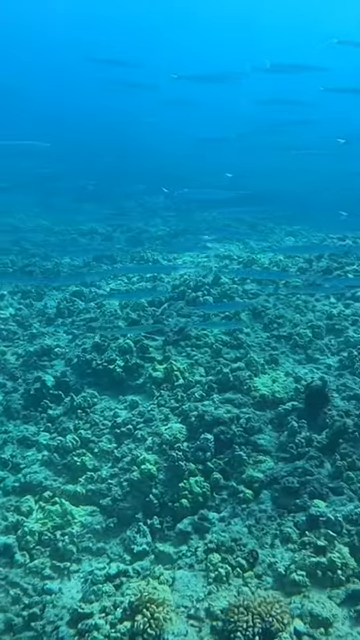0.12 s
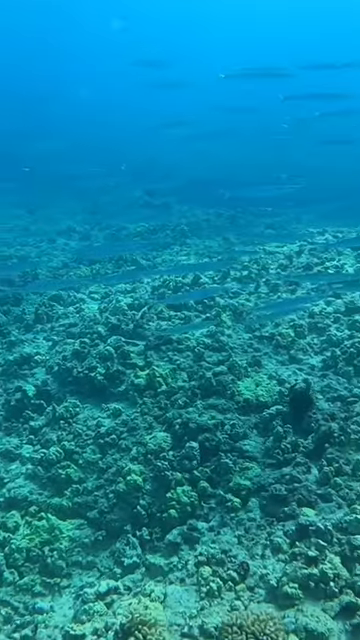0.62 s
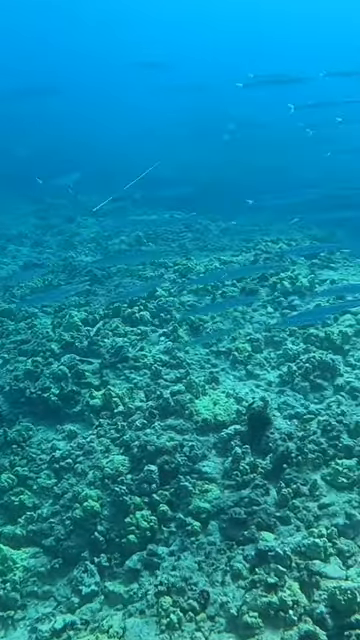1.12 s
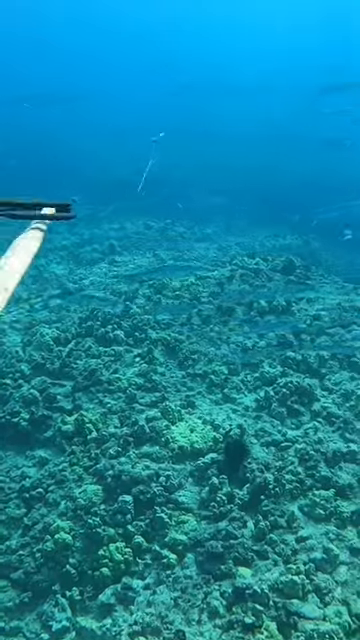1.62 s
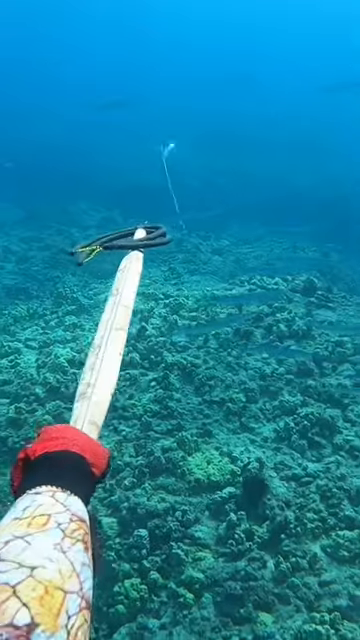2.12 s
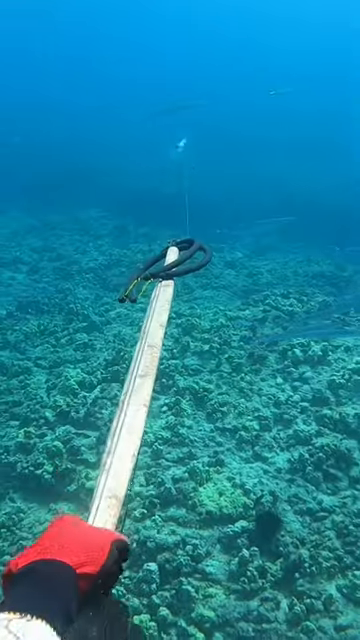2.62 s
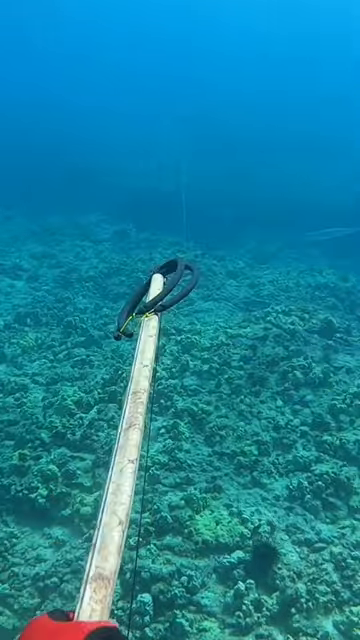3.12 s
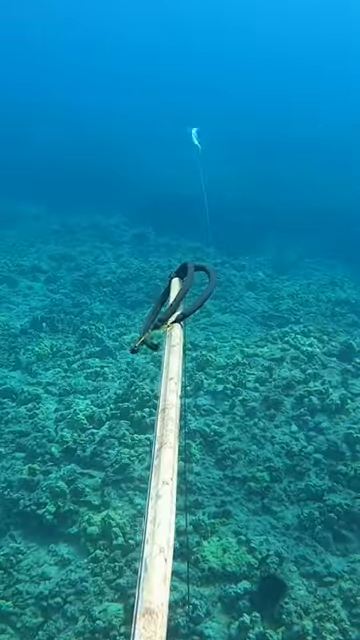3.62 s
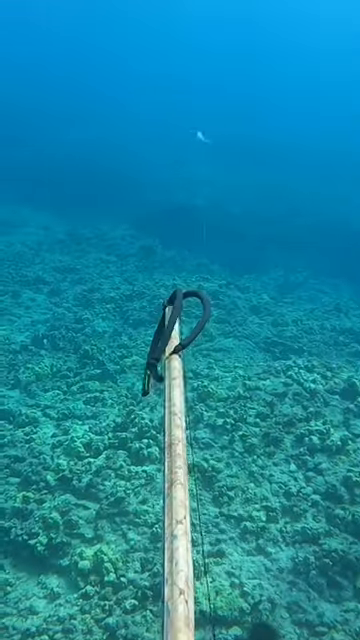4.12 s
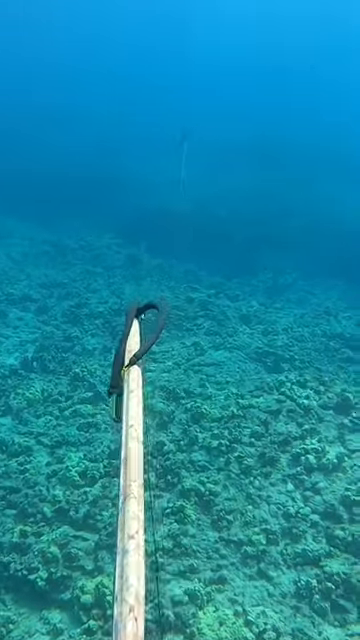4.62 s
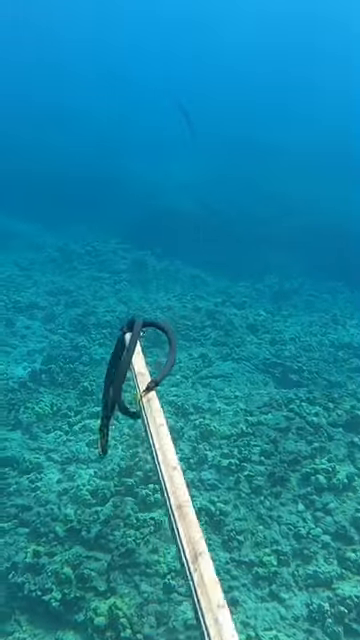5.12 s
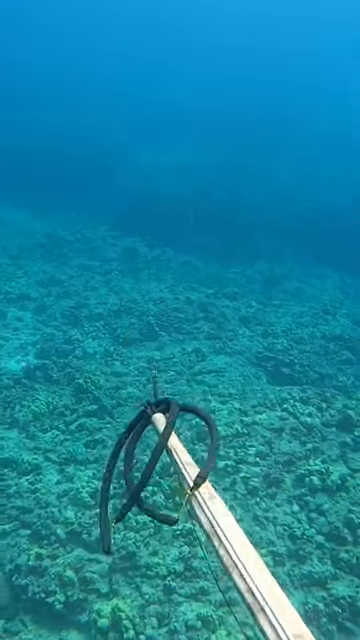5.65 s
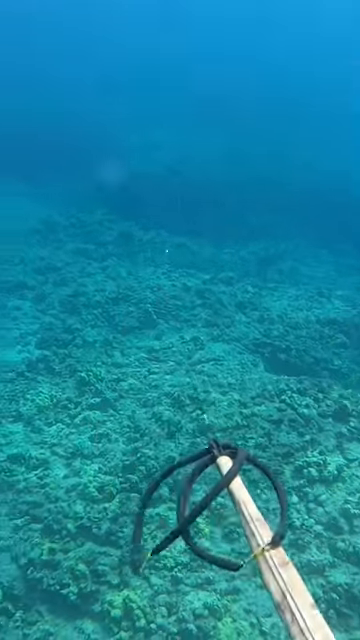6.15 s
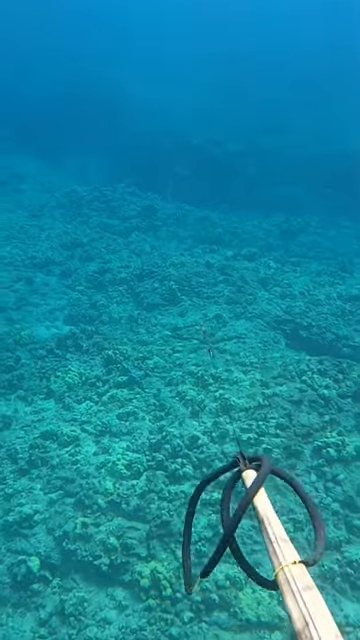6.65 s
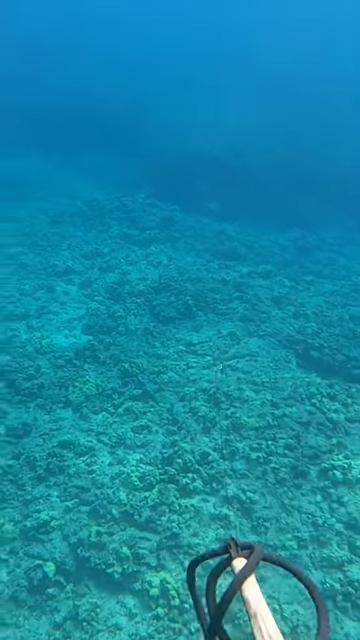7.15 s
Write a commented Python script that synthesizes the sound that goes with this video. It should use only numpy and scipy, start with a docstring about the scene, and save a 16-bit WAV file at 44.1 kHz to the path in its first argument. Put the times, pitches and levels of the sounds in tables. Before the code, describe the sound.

Low water turbulence and a steady snapping reef hiss, broken by hollow bumps on a housing, a hard crack, brief creaks, then rubbing.

```python
"""A small camera in a sealed case is carried under water over a reef.
From the start water rumbles and gurgles past the ports as filtered noise, and shrimp snap near and far
as noise puffs; three ticks, then knocks, a crack and taps ring briefly on the case.
From 3 s the camera fades from one microphone to its stereo pair; the grip creaks in stick-slip clicks
after 4 s, and from about 6 s something rubs along the case as friction grains through its modes."""
import sys
import numpy as np
from scipy import signal
from scipy.fft import rfft, irfft, next_fast_len
from scipy.io import wavfile
from scipy.ndimage import uniform_filter1d

SR = 44100
rng = np.random.default_rng(int(sys.argv[2]) if len(sys.argv) > 2 else 0)


def boost_factor(decibels):
    """Convert a level in decibels to a linear amplitude factor."""
    exponent = np.asarray(decibels, float) / 20
    return 10 ** exponent


def to_wav(sig):
    """Store sig (one row per channel, or 1-D mono) as 16-bit WAV at the path in sys.argv[1].

    Samples outside -1..1 are clipped; the rate is SR.
    """
    pcm = np.clip(np.atleast_2d(sig), -1, 1) * 32767
    pcm = np.round(pcm).astype(np.int16)
    wavfile.write(sys.argv[1], SR, pcm.T)  # frames by channels


N = 320148


def rms_one(x):
    """Scales x to an rms of 1."""
    return x / np.sqrt(np.mean(x ** 2) + 1e-20)


def in_time(rows):
    """Interpolates each column of a table over the scene."""
    s, *columns = np.transpose(rows)
    return [np.interp(np.arange(N) / SR, s, c) for c in columns]


def coloured(x, spectrum):
    """Shapes x by a (frequency [Hz], gain [dB]) spectrum."""
    hz, gain_db = np.transpose(spectrum)
    grid_hz = np.maximum(np.arange(N // 2 + 1) * SR / N, 1)
    curve_db = np.interp(np.log(grid_hz), np.log(hz), gain_db, left=-120, right=-120)
    return irfft(rfft(x) * boost_factor(curve_db), N)


def drift(rate):
    """Slow random wander of rms 1: coarse noise twice through a one-pole."""
    r = np.exp(-80 * np.pi * rate / SR)
    noise = rng.standard_normal(N // 40 + 2002)
    slow = signal.lfilter([1], [1, -2 * r, r * r], noise)[2000:]
    return np.interp(np.arange(N) / 40, np.arange(len(slow)), rms_one(slow))


def grains(per_s, spread_db, most=5):
    """Clicks at random moments, many small and few large."""
    size = boost_factor(spread_db * np.minimum(rng.exponential(1, N), most))
    signed = size * rng.choice([-1, 1], N)
    return rms_one(signed * (rng.random(N) < per_s / SR))


def band(x, low_hz, high_hz):
    """Butterworth band-pass."""
    return signal.sosfilt(signal.butter(2, [low_hz, high_hz], "band", fs=SR, output="sos"), x)


def add(out, s, burst):
    """Adds a burst at time s."""
    i = round(s * SR)
    out[i:i + len(burst)] += burst[:N - i]


def own_hiss():
    """Each channel's own electronics: faint independent high noise."""
    return boost_factor(-80.0) * band(rng.standard_normal((2, N)), 9100, 14300)


def puffs(per_s, spread_db, most):
    """Far snaps reach the case blurred into soft bursts of noise a few milliseconds long."""
    blur = np.hanning(SR // 200)
    envelope = np.convolve(np.abs(grains(per_s, spread_db, most)), blur, "same")
    return rms_one(envelope * rng.standard_normal(N))


# distant reef crackle: (time [s], level [dB], treble level [dB])
REEF_LEVELS = [(0.0, -37, -40), (0.95, -35.5, -41.5), (2.85, -40.5, -47), (4.39, -38.5, -44.5),
               (7.26, -42, -49)]


def reef():
    """Thousands of far shrimp merge into a hiss in waves, with lone bright snaps on top; one per mic."""
    level_db, treble_db = in_time(REEF_LEVELS)
    waves_db = 1.3 * drift(7.4)
    crackle = np.array([rng.standard_normal(N) + 0.095 * grains(400, 1.0) for mic in range(3)])

    low = band(crackle, 590, 1710) * boost_factor(level_db + waves_db + 2.37 * drift(25))

    middle = band(crackle + 0.43 * puffs(60, 4.9, most=2.9), 2730, 7850)
    middle *= boost_factor(level_db - 4.5 + waves_db + 1.46 * drift(45.0))

    bright = crackle + 0.12 * grains(45, 14.0, most=3.1) + 0.53 * puffs(30, 3.4, most=2.1)
    treble = band(bright, 6160, 10840) * boost_factor(treble_db + waves_db + 2.8 * drift(16.0))

    pricks = band(grains(30, 6.1, most=2.5), 10500, 15000) * boost_factor(treble_db - 10.5)
    return low + middle + treble + pricks


def pockets(per_s, cycles):
    """Small pockets of air, squeezed at random, ring down 60 dB in some cycles at one of 12 pitches."""
    clicks = grains(per_s, 4.0, most=3.0)
    dealt = rng.integers(0, 12, N)
    out = 0
    for k, hz in enumerate(np.geomspace(240, 700, 12)):
        r, w = boost_factor(-60 * hz / (cycles * SR)), 2 * np.pi * hz / SR
        struck = clicks * (dealt == k) + 1e-18
        out = out + np.sqrt(hz) * signal.lfilter([0, np.sin(w)], [1, -2 * r * np.cos(w), r * r], struck)
    return rms_one(out)


# spectra of the three sizes of turbulence: (frequency [Hz], gain [dB])
SURGE_SPECTRUM = [(2.9, -22), (5.0, -2), (28, -1.5), (47, -4.5), (90, -21), (120, -42), (200, -120)]
EDDY_SPECTRUM = [(70, -6), (95, 4.5), (150, 1.5), (190, -1), (235, -15.5), (330, -25)]
GURGLE_SPECTRUM = [(200, -11), (270, -4), (420, 2), (570, 1), (680, -11.5), (800, -17), (950, -84),
                   (1400, -42)]
# slow surge of water past the case: (time [s], level [dB])
SURGE_LEVELS = [(0, -27), (.4, -32.5), (.6, -28), (1.3, -26), (1.55, -22.5), (1.9, -20.5), (2.09, -28),
                (2.3, -19), (2.47, -23.5), (2.66, -19.5), (2.85, -29), (3.5, -20), (3.88, -29.5),
                (4.18, -20.5), (4.52, -32), (5.05, -20), (5.42, -31), (5.75, -24), (6.2, -30), (6.6, -24.5),
                (6.84, -26), (7.03, -33), (7.25, -25)]
# churn at the ports as the case is swung about: (time [s], eddy level [dB], gurgle level [dB])
CHURN_LEVELS = [(0, -47, -57.5), (0.42, -44, -56), (0.56, -41.5, -56), (1.05, -36, -49),
                (1.22, -33.5, -53.5), (1.4, -32.5, -47), (1.52, -34.5, -46.5), (1.6, -33.5, -43),
                (1.67, -29, -42), (1.76, -32, -44.5), (1.95, -38.5, -47.5), (2.5, -35, -45.5),
                (2.8, -37, -43.5), (3.04, -33, -44), (3.6, -38, -46), (4.0, -44, -49), (4.6, -41, -50),
                (5.0, -39.5, -56.5), (5.4, -40, -55.5), (5.75, -42, -54), (5.95, -29, -49.5),
                (6.15, -31, -47.5), (6.35, -40.5, -53), (6.85, -34.5, -49.5), (7.26, -43, -49.5)]


def flow():
    """Turbulence in three sizes: slow surge, lumpy eddies, small gurgling pockets of air."""
    surge_db, = in_time(SURGE_LEVELS)
    eddy_db, gurgle_db = in_time(CHURN_LEVELS)
    lumps = drift(10.5)   # shared by eddies and gurgle

    surge = rms_one(coloured(rng.standard_normal(N), SURGE_SPECTRUM))

    eddy = coloured(rng.standard_normal(N), EDDY_SPECTRUM)
    eddy = rms_one(eddy * boost_factor(2.56 * lumps + 1.3 * drift(12.0)))

    wash = rms_one(band(rng.standard_normal(N), 120, 1320))
    wash = wash + 1.03 * pockets(120 * boost_factor(2.5 * lumps), cycles=31.0)
    gurgle = rms_one(coloured(wash, GURGLE_SPECTRUM) * boost_factor(3.02 * lumps))
    return boost_factor(surge_db) * surge + boost_factor(eddy_db) * eddy + boost_factor(gurgle_db) * gurgle


# the sharpest snaps: (time [s], level [dB], treble gain [dB])
SNAP_EVENTS = [(0.257, -35, 15), (0.354, -22, -1), (0.678, -26, -2), (0.943, -17, -7), (0.962, -17.5, -13),
               (1.0886, -13.5, -29), (1.253, -21.5, -2), (2.513, -25, -1), (2.619, -21.5, -24),
               (2.709, -22, 6), (2.966, -28, -2), (3.178, -25.5, 1), (3.236, -21, -3), (3.329, -19, -5),
               (3.646, -24.5, -6), (3.93, -23, 4), (4.017, -22, -5), (4.225, -24, -7), (4.657, -24.5, -14),
               (4.761, -36, 9), (5.227, -39.5, 14), (5.437, -32, 1), (5.576, -27, 3), (5.752, -32, 0),
               (5.8833, -16.5, -11)]


def snaps():
    """A bubble collapses: a noise puff of a few milliseconds, each with its own share of treble."""
    out, t = np.zeros(N), np.arange(SR // 50) / SR
    envelope = np.exp(-t / 0.004) * (1 - np.exp(-t / 0.003))
    bursts = rng.standard_normal((len(SNAP_EVENTS), len(t))) * envelope
    for (s, level_db, treble_db), puff in zip(SNAP_EVENTS, bursts):
        body = band(puff, 2300, 7600) + boost_factor(-1.5) * band(puff, 1080, 1880)
        treble = boost_factor(treble_db) * band(puff, 6000, 15000)
        add(out, s, boost_factor(level_db) * (body + treble))
    return out


# thin ticks at the right port: (time [s], level [dB])
TICK_EVENTS = [(0.2415, -29), (0.3628, -40), (0.48, -19)]


def ticks():
    """Each tick is a single hair-thin decaying ring, very high."""
    tick_hz, decay_s = 12900, 0.00026
    out, t = np.zeros(N), np.arange(SR // 200) / SR
    ring = np.sin(2 * np.pi * tick_hz * t) * np.exp(-t / decay_s)
    for s, level_db in TICK_EVENTS:
        add(out, s, boost_factor(level_db) * ring)
    return band(out, 11300, 16500)


# short creaks of the grip: (time [s], length [s], click level [dB], slip rate [1/s], squeak re click [dB])
CREAK_EVENTS = [(4.239, 0.03, -5.5, 460, -9), (4.33, 0.039, -3, 560, -14)]
# the grip's own thin rings: (frequency [Hz], level [dB])
SQUEAK_RINGS = [(1500, -16), (2370, -6.5), (3290, 1.5)]


def creaks():
    """Stick and slip: a short, uneven run of dull clicks that also sets the grip squeaking."""
    clicks, thin = np.zeros(N), np.zeros(N)
    for s, length_s, level_db, per_s, squeak_db in CREAK_EVENTS:
        at = np.arange(0, length_s, 1 / per_s)
        jitter_s, uneven_db = rng.normal(0, [[.0002], [4]], (2, 64))[:, :len(at)]
        where = ((s + at + jitter_s) * SR).astype(int)
        arch = np.sin(np.pi * (at + 0.0037) / (length_s + 0.0064))
        clicks[where] = boost_factor(level_db + uneven_db) * arch
        thin[where] = clicks[where] * boost_factor(squeak_db)
    creak = band(band(clicks, 450, 1380), 520, 1420)
    squeak = np.zeros(N)
    for hz, ring_db in SQUEAK_RINGS:
        squeak += boost_factor(ring_db) * band(band(thin, hz - 150, hz + 150), hz - 150, hz + 150)
    return creak, squeak


# harder strokes on top of the drag:
# (start [s], hold [s], level [dB], low bands re middle [dB], top band re middle [dB])
STROKE_EVENTS = [(6.136, 0.053, -32.5, 6, 2), (6.471, 0.093, -36, 4.5, 5.5), (6.599, 0.026, -29.5, 2, 2.5),
                 (6.705, 0.017, -28, 2, 1), (6.737, 0.017, -29.5, 8, 8), (6.788, 0.06, -40, 9.5, 11),
                 (6.887, 0.01, -36, 10.5, 7), (6.981, 0.051, -29, 5.5, 6)]


def strokes():
    """Rubbing pressure in dB and its colour: the hardest of light drag and strokes holds at each moment."""
    drag_from_s, drag_db, drag_onset_db_per_s = 6.04, -41, 304
    drag_low_db, drag_top_db = 5.5, 3
    rise_db_per_s, fall_db_per_s = 696, 445
    t = np.arange(N) / SR
    level_db = drag_db - drag_onset_db_per_s * np.maximum(drag_from_s - t, 0)
    colour_db = np.outer([drag_low_db, drag_top_db], np.ones(N))
    for s, hold_s, peak_db, *stroke_colour_db in STROKE_EVENTS:
        rise_db = rise_db_per_s * np.maximum(s - t, 0)
        fall_db = fall_db_per_s * np.maximum(t - s - hold_s, 0)
        stroke_db = peak_db - rise_db - fall_db
        colour_db = np.where(stroke_db > level_db, np.array(stroke_colour_db)[:, None], colour_db)
        level_db = np.maximum(level_db, stroke_db)
    return level_db, *uniform_filter1d(colour_db, size=SR // 50)


def rub():
    """Dense friction grains; the contact wanders, so each group of modes swells on its own."""
    level_db, low_db, top_db = strokes()
    grit = np.array([0.37 * rng.standard_normal(N) + grains(1500, 1.6) for mic in range(3)])
    grit *= boost_factor(2.0 * drift(22))
    edges_hz = [650, 1000, 1240, 1450, 2100, 3450, 4400, 13000]
    out = 0
    for low_hz, high_hz in zip(edges_hz, edges_hz[1:]):
        if high_hz < 2500:
            swell_db = low_db + 3.0 * drift(10.5)
        else:
            swell_db = 1.08 * drift(11.5) + top_db * (low_hz - 2100) / 2300
        out = out + boost_factor(swell_db) * band(grit, low_hz, high_hz)
    return boost_factor(level_db) * out


def whines():
    """The rubbing catches and sings faintly in two thin tones that waver in pitch and level."""
    level_db = strokes()[0] - 25
    tones = np.zeros(N)
    for hz in (1090, 1325):
        cycles = np.cumsum(hz * (1 + 0.031 * drift(5.0))) / SR
        tones += np.sin(2 * np.pi * cycles) * boost_factor(5.9 * np.minimum(drift(7.0), 1.5))
    return boost_factor(level_db) * tones


# sharp taps: (time [s], level [dB], decay time constant [ms])
TAP_EVENTS = [(1.1385, -14, 4.7), (2.0755, -27, 3), (3.784, -23.5, 9.2), (3.8182, -27.5, 10),
              (3.844, -24.5, 10), (4.5734, -23.5, 7.7), (4.7707, -16.5, 2.7), (5.4886, -14.5, 1.4),
              (5.535, -22, 1.8)]


def taps():
    """A hard point meets the wall: highs arrive first, the ring sweeps down within a few cycles."""
    start_hz, end_hz, sweep_s, rise_s = 743, 145, 0.0023, 0.0018
    body, contact, t = np.zeros(N), np.zeros(N), np.arange(SR // 20) / SR
    cycles = end_hz * t + (start_hz - end_hz) * sweep_s * (1 - np.exp(-t / sweep_s))
    ring = np.sin(2 * np.pi * cycles) * (1 - np.exp(-(t / rise_s) ** 2))
    noise = rng.standard_normal((len(TAP_EVENTS), len(t)))
    for (s, level_db, decay_ms), puff in zip(TAP_EVENTS, noise):
        add(body, s, boost_factor(level_db) * ring * np.exp(-1000 * t / decay_ms))
        add(contact, s, boost_factor(level_db - 8.0) * puff * np.exp(-t / 0.0021))
    return body, band(contact, 1070, 2800)


# rings of the loud crack: (frequency [Hz], level [dB], time to fall 60 dB [s])
CRACK_RINGS = [(600, -20.5, 0.012), (1580, -14.5, 0.0079), (3500, -15.5, 0.0048), (5340, -19.5, 0.0041),
               (6500, -37, 0.0083)]


def crack():
    """One hard blow: a few milliseconds of bright ringing."""
    crack_s, rise_s = 1.1376, 0.00027
    out, ring, t = np.zeros(N), 0, np.arange(SR // 20) / SR
    for hz, level_db, t60_s in CRACK_RINGS:
        ring = ring + boost_factor(level_db) * np.sin(2 * np.pi * hz * t) * boost_factor(-60 * t / t60_s)
    add(out, crack_s, ring * (1 - np.exp(-t / rise_s)))
    return out


# dull knocks: (time [s], level [dB], ring [Hz], decay time constant, held to 1.5-20 [ms], thud re ring [dB])
KNOCK_EVENTS = [(0.559, -14.5, 452, 1.84, -7), (0.942, -19, 404, 1.9, -7), (1.073, -28, 567, 5.8, 14.5),
                (1.33, -19, 535, 4.2, 3.5), (1.473, -16, 522, 6.2, 0), (1.498, -40, 326, 5, 17),
                (1.527, -16.5, 484, 4.6, 9.5), (1.541, -34.5, 378, 5, 27.5), (1.559, -31.5, 365, 7, 16),
                (1.637, -22, 356, 17, 7), (1.651, -22, 254, 11, -4), (1.664, -24, 358, 13, 12),
                (1.686, -20, 292, 9.3, 4), (1.712, -29, 540, 7, 0), (1.757, -18, 460, 2.6, -7),
                (2.076, -12.5, 546, 6, 12.5), (2.181, -24.5, 537, 8.6, -13), (2.326, -26.5, 520, 12, 10.5),
                (2.535, -32.5, 430, 23, 19), (2.619, -27.5, 350, 8.8, 15.5), (2.812, -22, 528, 7.3, -20),
                (2.956, -21.5, 615, 4.5, 7.5), (3, -25, 538, 17.4, 15), (3.104, -30.5, 427, 8.6, 18.5),
                (3.412, -22, 484, 6.5, -3), (3.433, -16, 433, 5.2, 8.5), (3.504, -21.5, 396, 4.8, 9.5),
                (3.609, -21, 352, 8, -3), (3.636, -23, 460, 2.9, 4), (3.837, -28, 330, 5.5, 5),
                (3.877, -31, 477, 4.1, 5), (4.054, -30.5, 403, 17.4, -2), (4.404, -30.5, 600, 5.1, 7.5),
                (5.554, -22, 595, 4.5, -10), (5.959, -34.5, 430, 13, -15), (6.41, -23.5, 424, 7, 11),
                (6.625, -26, 428, 5.7, 0), (6.819, -11.5, 423, 5.6, -4)]


def knocks():
    """Each knock: a short ring dropping in pitch, a low thud of a few cycles, a puff of contact noise."""
    centre_hz, spread = 144, 0.24   # the whole case rocks at about one pitch
    body, contact, t = np.zeros(N), np.zeros(N), np.arange(SR // 8) / SR
    hurried = t + 0.28 * 0.0011 * (1 - np.exp(-t / 0.0034))   # bending waves: the highs arrive first
    rise = 1 - np.exp(-t / 0.0055)
    noise = rng.standard_normal((len(KNOCK_EVENTS), len(t)))
    for (s, level_db, ring_hz, decay_ms, thud_db), puff in zip(KNOCK_EVENTS, noise):
        thud_hz = centre_hz * (1 + spread * np.tanh(puff[-1]))   # last noise sample: random pitch
        ring = np.sin(2 * np.pi * ring_hz * hurried) * np.exp(-1000 * t / np.clip(decay_ms, 1.5, 20))
        thud = np.sin(2 * np.pi * thud_hz * hurried) * np.exp(-t / 0.0075) * boost_factor(thud_db)
        add(body, s, boost_factor(level_db) * rise * (ring + thud))
        add(contact, s, boost_factor(level_db - 11.5) * puff * np.exp(-t / 0.014))
    return body + boost_factor(5.0) * band(contact, 210, 525), band(contact, 890, 1680)


# modes of the case: (frequency [Hz], width [Hz], single mic [dB], left [dB], right [dB],
# phase lead of right [rad], extra when touched [dB])
CASE_MODES = [(837, 107, -63, -18, -17, 5, 17.5), (1134, 114, -7.5, -8.5, -16, -4.5, 5),
              (1350, 236, -10, -8.5, -3.5, 1.55, 1.5), (1650, 226, -6.5, -4.5, -3, 0.45, 3),
              (2307, 225, -8, -3.5, -5, -1, -6.5), (2829, 121, 3, 6.5, 7, 0.9, 11.5),
              (3144, 184, -1.5, 3, -12, 0.5, 10), (3416, 120, -2, -4.5, -1, 3.5, -16),
              (3875, 240, -4.5, -0.5, -1.5, 0.84, 5), (4367, 480, -3.5, -4.5, -0.5, 1.57, -0.5),
              (4962, 264, -6, -3, 5.5, 1.66, 5), (5454, 395, -4.5, -5, 0.5, 2, -39),
              (7095, 470, -21, -18, -10.5, 0.9, -41), (10000, 11600, -46.5, -39.5, -17, 3.5, -28),
              (10460, 12000, -34, -16.5, -34.5, 3.5, -21)]


def case(x, apart, touched=False):
    """Modes carry x to the single mic and both ports; a share of the shaking reaches each port alone."""
    size = next_fast_len(N + 4096)
    hz = np.arange(size // 2 + 1) * SR / size
    ports = np.zeros((3, len(hz)), complex)
    sharpness = 1 + .5 * touched   # by touch the sound stays in the walls: modes stand out more
    for k, (mode_hz, width_hz, *level_db, lead_rad, touch_db) in enumerate(CASE_MODES):
        peak = 1j * hz * width_hz / (mode_hz ** 2 - hz ** 2 + 1j * hz * width_hz)
        lead = np.exp(1j * lead_rad * np.array([0, 0, 1]))
        gains = boost_factor(np.array(level_db) + touched * touch_db) * lead
        ports += (-1) ** k * peak ** sharpness * gains[:, None]
    share = np.clip(apart, 0, 1)
    shaken = [x[0], *(np.sqrt(1 - share) * x[0] + np.sqrt(share) * x[1:])]
    return irfft(rfft(shaken, size) * ports, size)[:, :N]


# fade from single mic to stereo pair: (time [s], share of the pair [0-1])
PAIR_SHARE = [(3.0, 0), (3.6, .25), (5, .6), (7.26, 1)]


def scene():
    """Sums the sounds through the case and the water, fading from single mic to stereo pair."""
    pair, = in_time(PAIR_SHARE)
    thuds, contact = knocks()
    tapped, tap_contact = taps()
    creak, squeak = creaks()

    heard = case(reef() + snaps() + creak + contact + tap_contact, apart=0.54)
    single, *ports = heard + case(rub(), apart=0.37, touched=True)

    water = flow() + thuds + tapped + whines() + crack()
    water = water + boost_factor(-14.0) * band(creak, 490, 970) + squeak
    # the right port is more open and a little late
    right_water = boost_factor(2.0) * signal.lfilter([.2], [1, -.8], water)

    stereo = ports + np.array([water, right_water])
    out = (1 - pair) * (single + water) + pair * stereo + own_hiss()
    out[1] += ticks()
    ends = np.minimum(np.arange(N) / 400, np.arange(N, 0, -1) / 150)   # fades of a few ms
    return out * np.clip(ends, 0, 1)


def band_limit(x):
    """A steep low-pass at the top of the band."""
    return signal.sosfilt(signal.butter(12, 16500, fs=SR, output="sos"), x)


def record(dry):
    """A steep low-pass cuts the top, 50 dB down from 15.9 kHz."""
    top_cut = signal.cheby2(10, 50, 15900, fs=SR, output="sos")
    mix = signal.sosfilt(top_cut, dry)
    return band_limit(mix)


dry = scene()
out = record(dry)
to_wav(out)
```